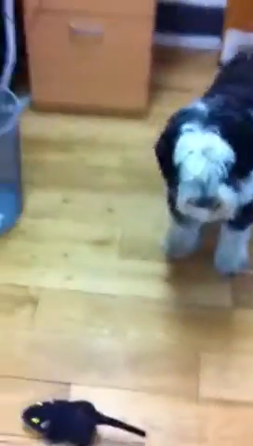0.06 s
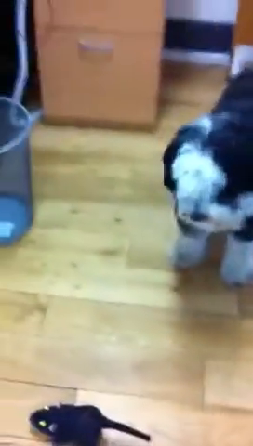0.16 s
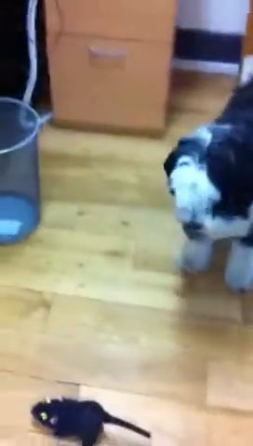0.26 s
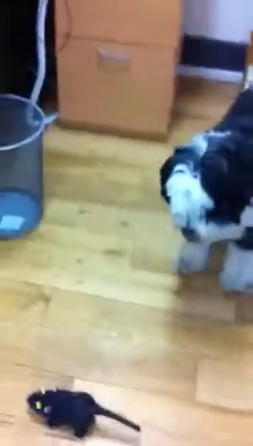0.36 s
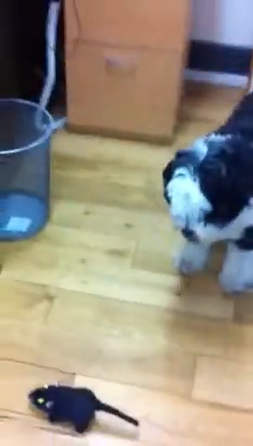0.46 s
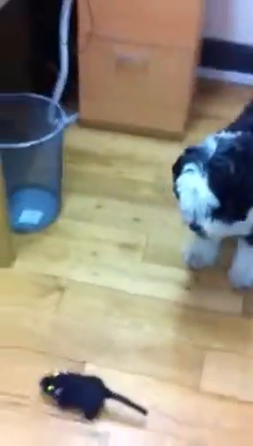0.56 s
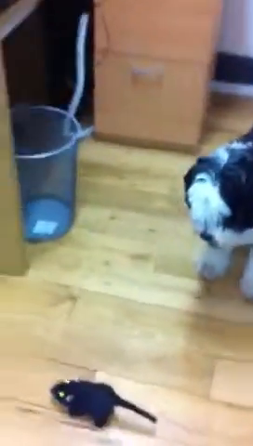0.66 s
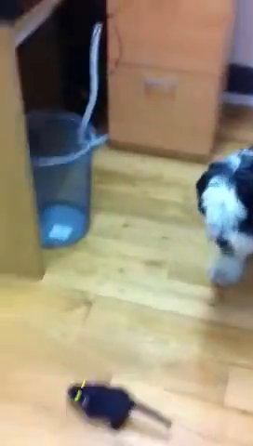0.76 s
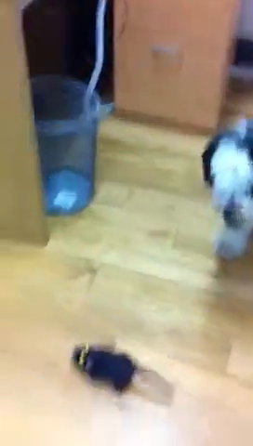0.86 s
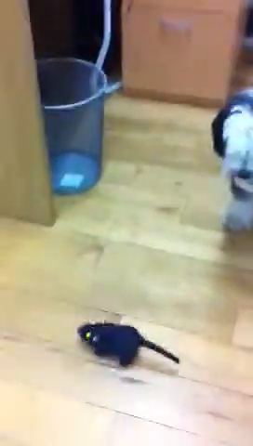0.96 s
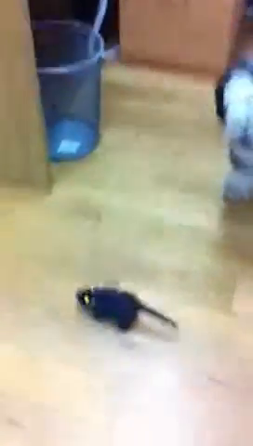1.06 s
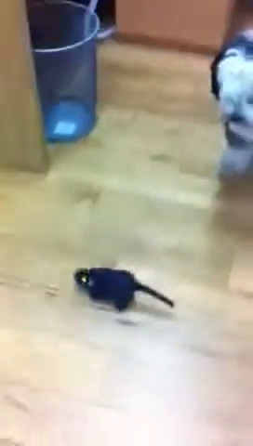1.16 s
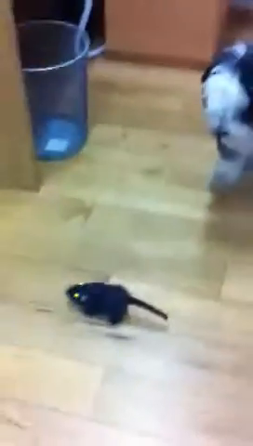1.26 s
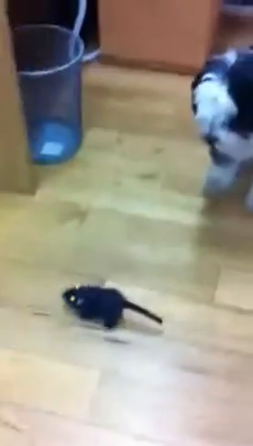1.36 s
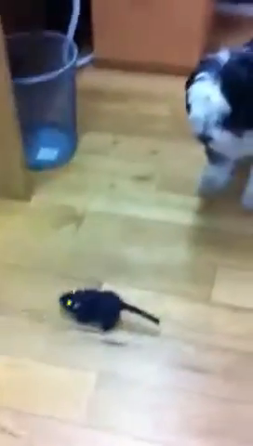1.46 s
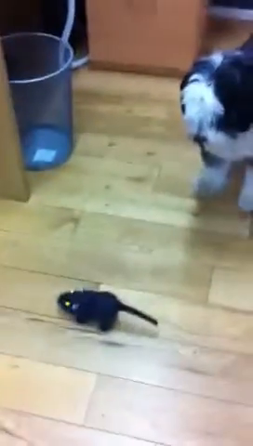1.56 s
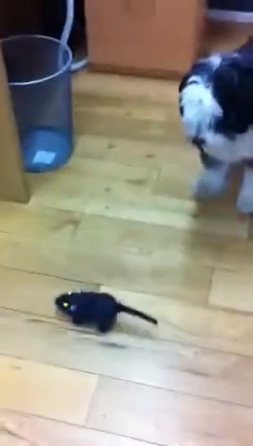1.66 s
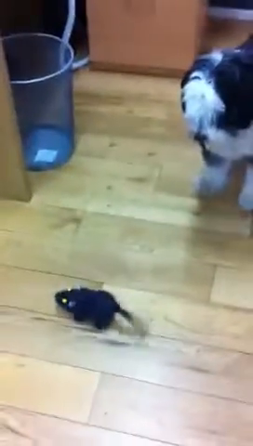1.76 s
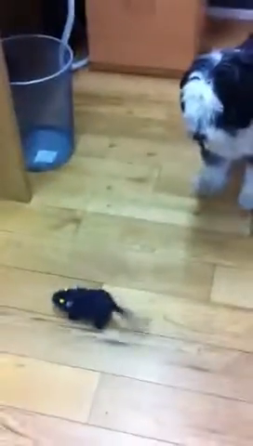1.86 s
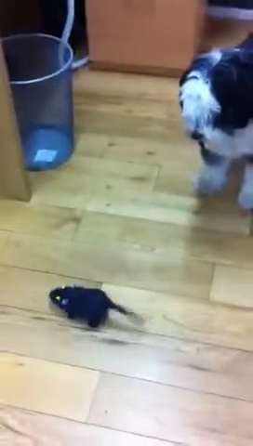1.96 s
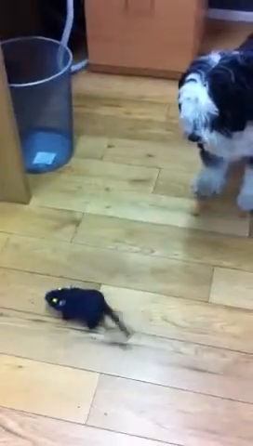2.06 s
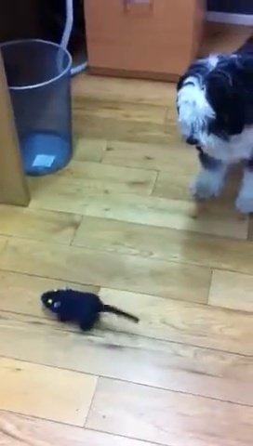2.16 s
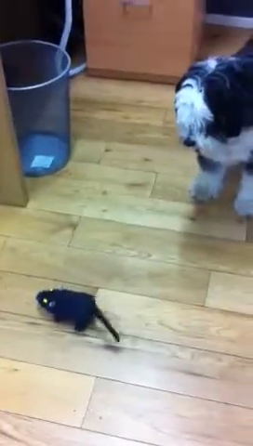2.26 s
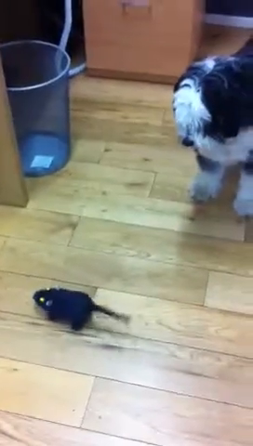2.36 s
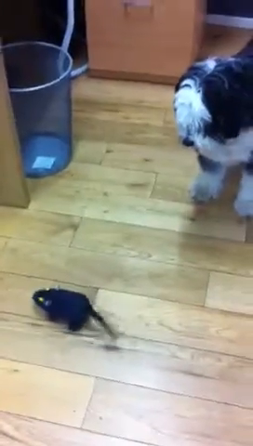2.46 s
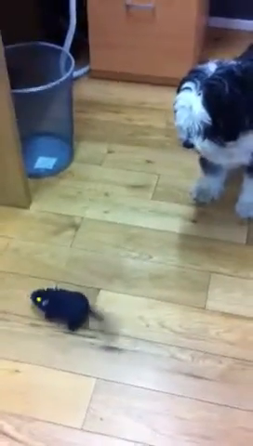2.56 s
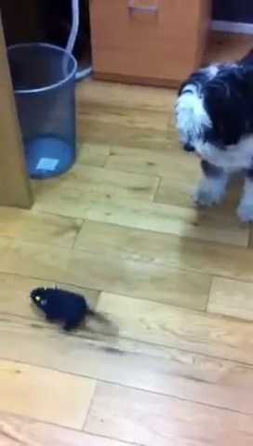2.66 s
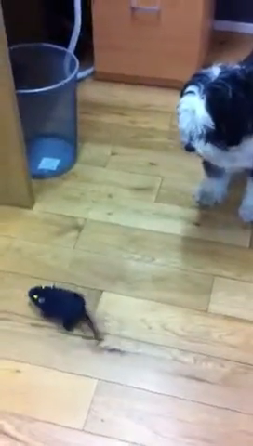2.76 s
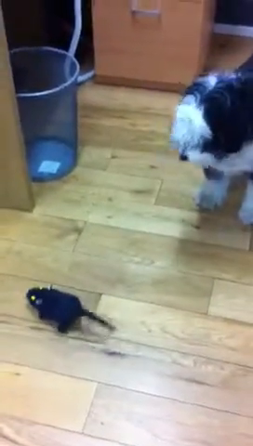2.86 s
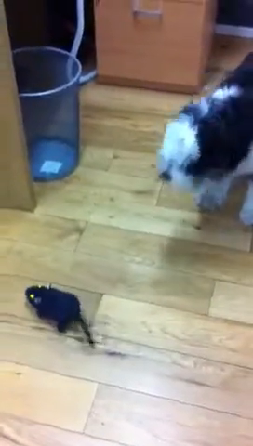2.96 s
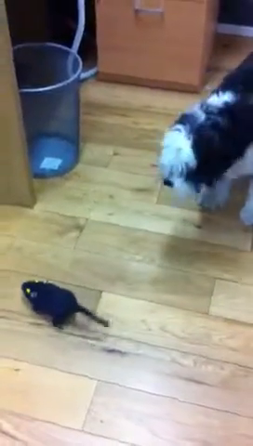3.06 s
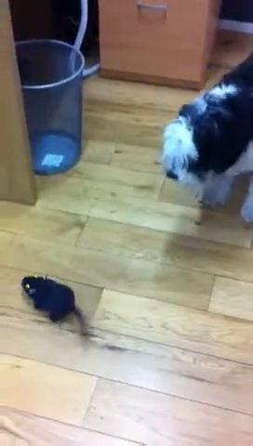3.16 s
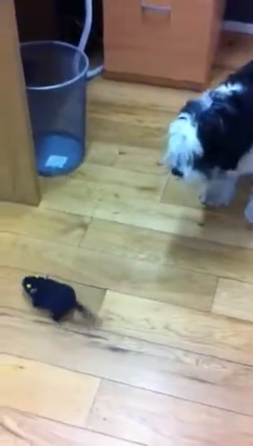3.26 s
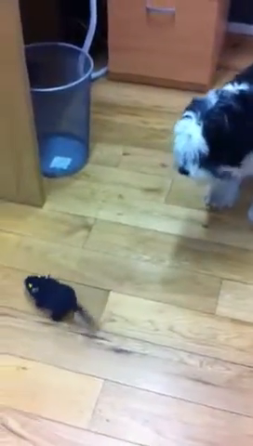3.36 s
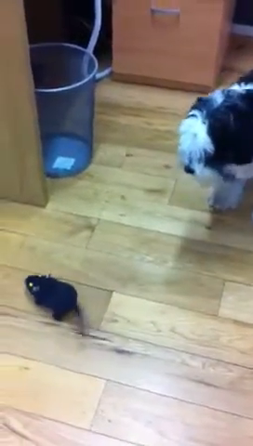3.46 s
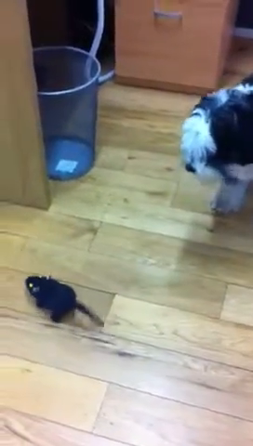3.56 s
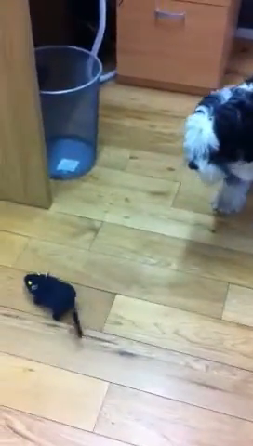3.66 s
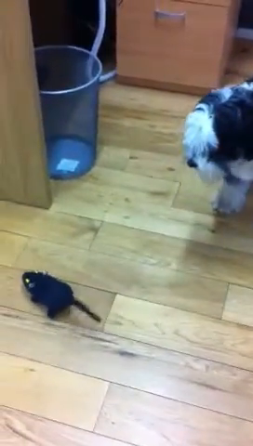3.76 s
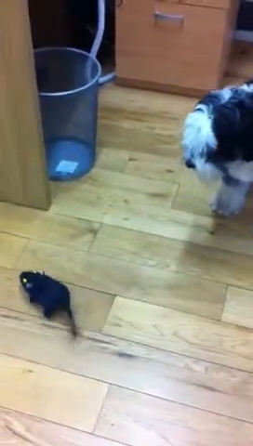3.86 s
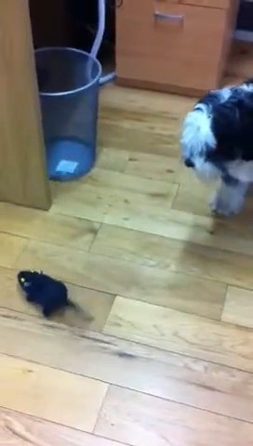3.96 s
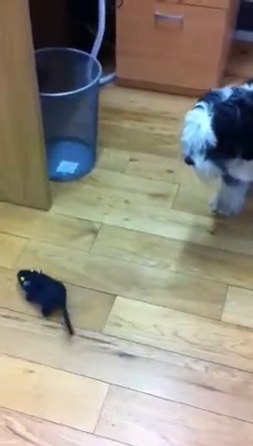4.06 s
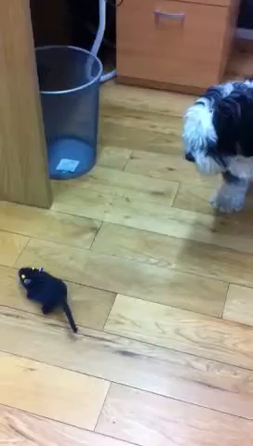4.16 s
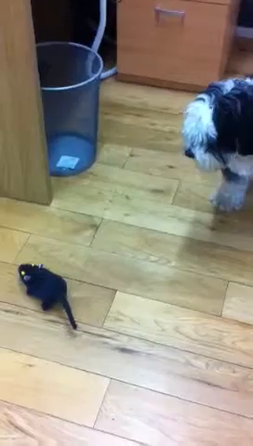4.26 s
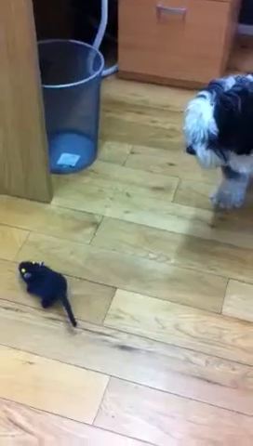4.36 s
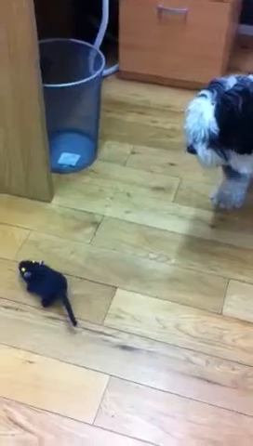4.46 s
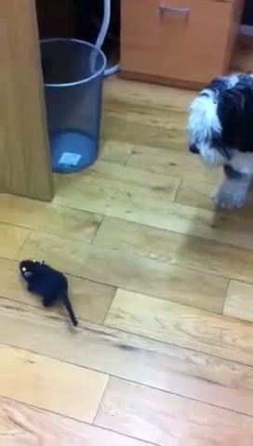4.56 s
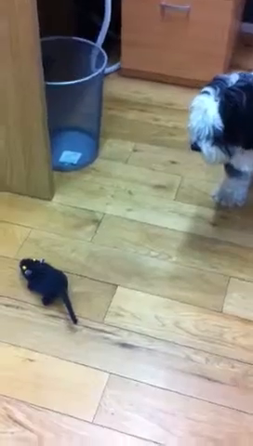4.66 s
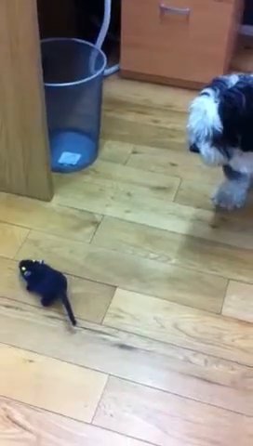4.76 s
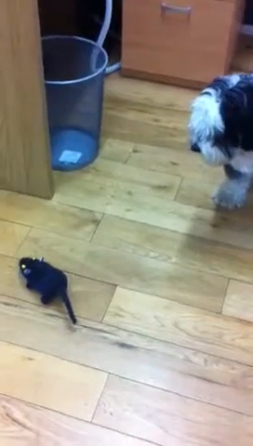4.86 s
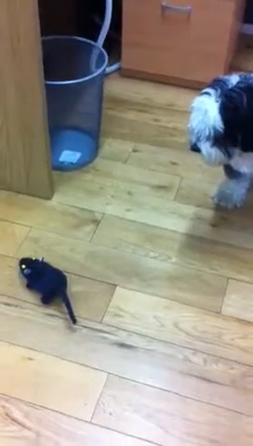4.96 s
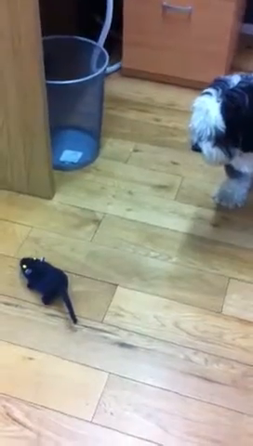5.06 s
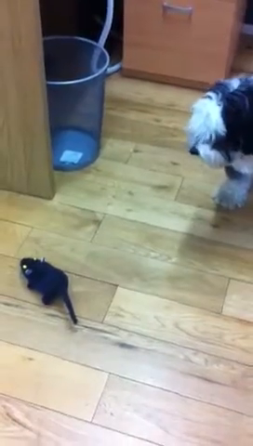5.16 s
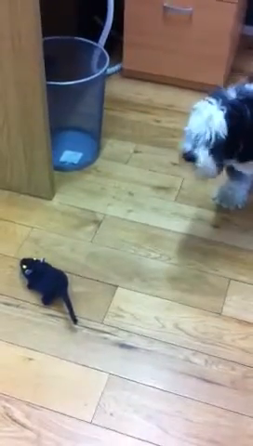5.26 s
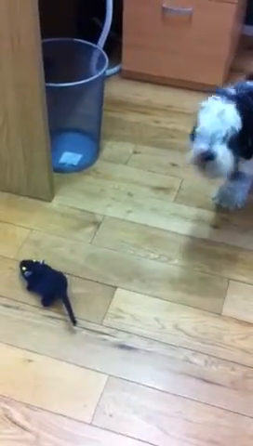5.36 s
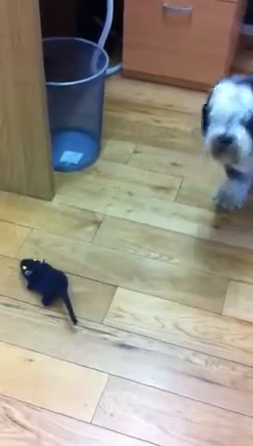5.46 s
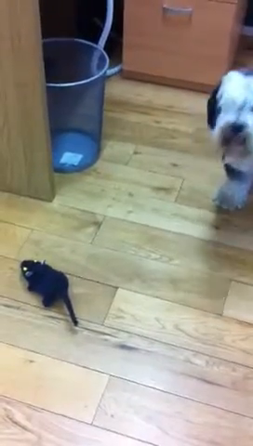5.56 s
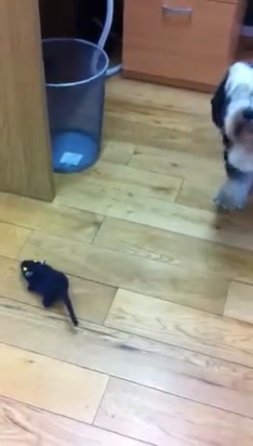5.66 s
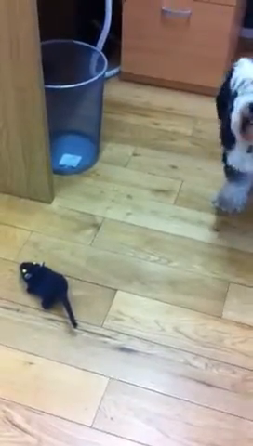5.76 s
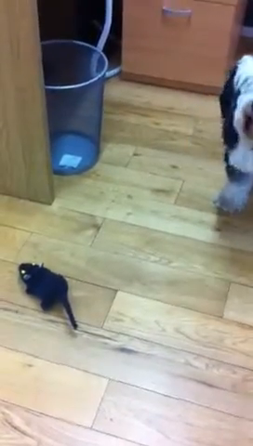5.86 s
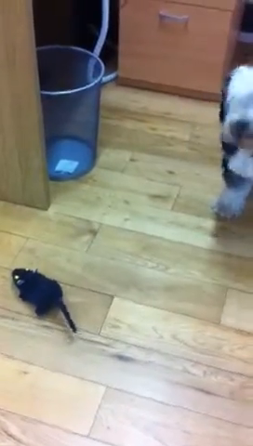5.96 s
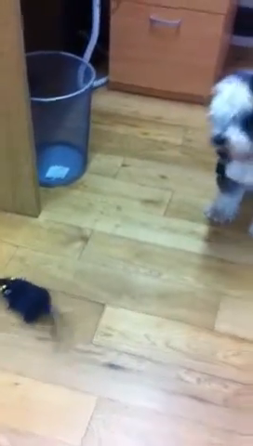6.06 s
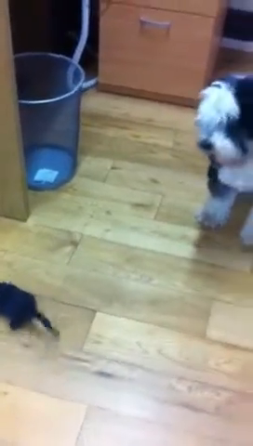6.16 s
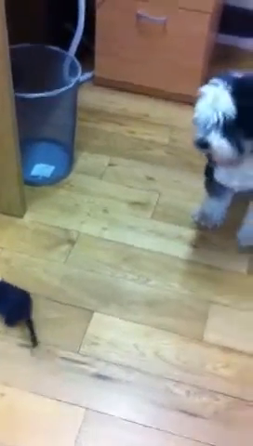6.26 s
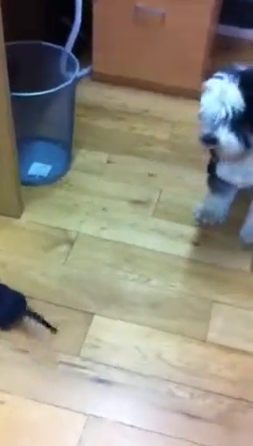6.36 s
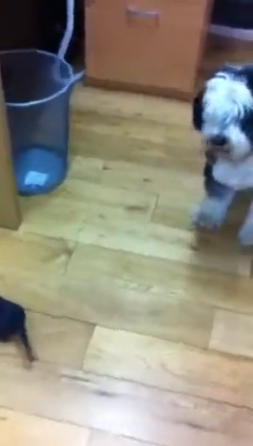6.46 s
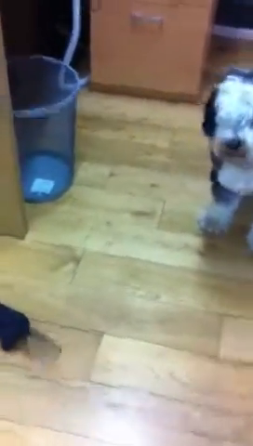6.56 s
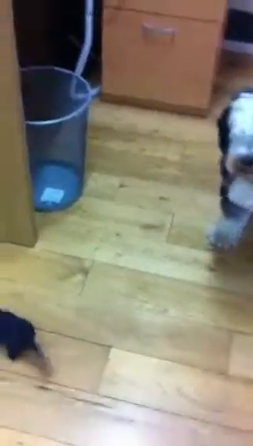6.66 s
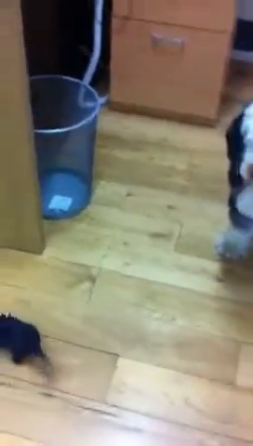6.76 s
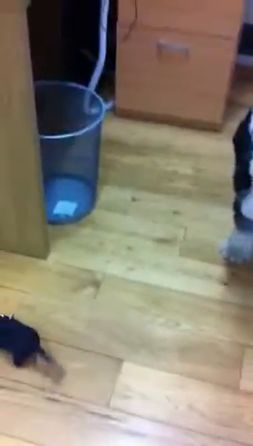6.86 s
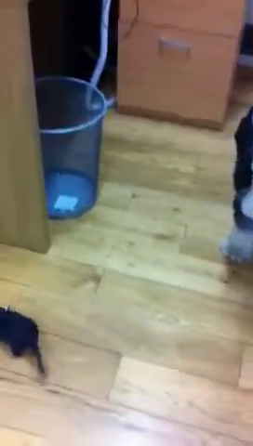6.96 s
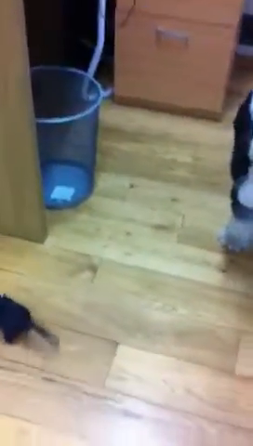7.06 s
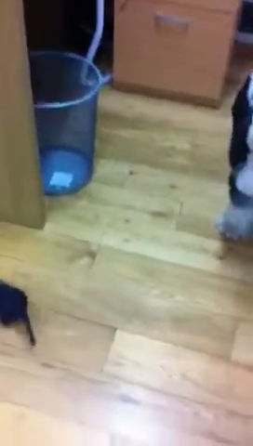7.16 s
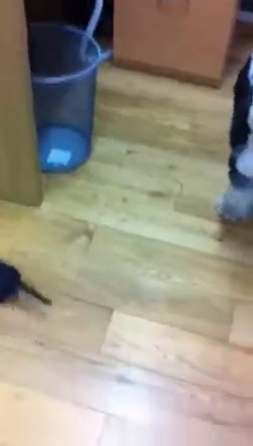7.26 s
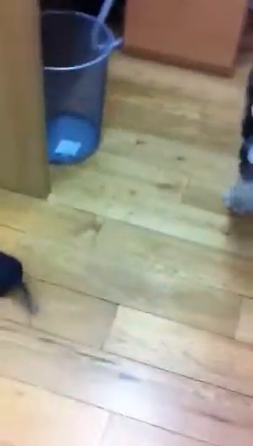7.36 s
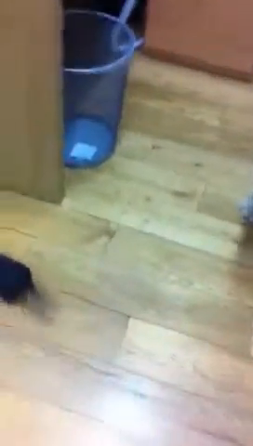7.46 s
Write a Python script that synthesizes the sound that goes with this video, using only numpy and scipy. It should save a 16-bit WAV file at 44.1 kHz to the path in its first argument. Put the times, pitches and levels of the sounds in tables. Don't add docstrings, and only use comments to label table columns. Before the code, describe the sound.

A battery toy whirs steadily on floorboards, chirping and clicking in two rapid, regular runs. Between them only the motor, tiny ticks, light paw steps and a faint sniff remain, broken by one abrupt dog bark. A second bark cuts into the later squeaks. After they stop, nails snap briefly on the boards. The room is small and reverberant, captured by a small recorder that ducks after loud sounds.

```python
import sys
import numpy as np
from scipy import signal
from scipy.io import wavfile
from scipy.ndimage import uniform_filter1d, minimum_filter1d

SR = 44100
rng = np.random.default_rng(int(sys.argv[2]) if len(sys.argv) > 2 else 0)


def amp(db):
    return 10 ** (np.asarray(db, float) / 20)


def write(x):
    x = np.atleast_2d(x).T
    wavfile.write(sys.argv[1], SR, np.round(np.clip(x, -1, 1) * 32767).astype(np.int16))


N = 330750
LEAD = 8820

# frequency in Hz, level in dB per Hz.
AIR_COLOUR = [(18, -60.5), (30, -10), (86, -26.5), (194, -7), (473, -14.5), (844, -14), (1960, -13),
              (2120, -0.5), (2540, -16.5), (10500, -15.5), (16000, -23.5)]
AIR_DB = -53.5
# frequency in Hz, time to fade by 60 dB in seconds.
ROOM_RING = [(150, 0.36), (500, 0.6), (1000, 0.55), (2000, 0.55), (4000, 0.7), (8000, 0.46), (14000, 0.38)]

# time in seconds, shaft turns per second in Hz.
MOTOR_SPEED = [(0, 224.6), (1.1, 230.7), (1.6, 224.3), (2.1, 213.6), (3.5, 211.7), (4.0, 213.3),
               (4.3, 224.6), (5.2, 227.2), (5.9, 224.6), (6.15, 216.5), (6.5, 213), (7.5, 212)]
IDLE_HZ, BUSY_HZ = 211, 227
# multiple of shaft speed, level idling in dB, level busy in dB.
MAIN_TONES = [(1, -75, -67), (4, -74.5, -63.5), (10, -60, -61.5)]
# multiple of shaft speed, level in dB against the tenth multiple.
SIDE_TONES = [(5, -14.5), (8, -7), (9, -6.5), (20, -17.5)]
# frequency in Hz, level in dB per Hz.
GEAR_COLOUR = [(240, -53), (400, -18), (537, -30.5), (781, -6.5), (845, -8.5), (1000, -14.5), (1910, -8),
               (2070, -12.5), (2510, -10.5), (6000, -23), (7800, -69), (13200, -120)]
GEAR_IDLE_DB, GEAR_BUSY_DB = -53, -49.5
THROB_HZ, THROB_DB, THROBS_PER_S = 157, -66.5, 11.3

# start in seconds, peak in dB, board pitch in Hz,
# slap of the skin in dB, shudder pitch of the floor in Hz.
PAW_THUDS = [
    (.259, -24.5, 365, -13, 376),
    (2.146, -34, 233, -23, 559),
    (2.79, -47.5, 300, -12.5, 402),
    (3.96, -45.5, 330, -1.5, 600),
    (4.099, -42, 190, -16.5, 400),
    (5.848, -41, 340, -3, 395.3),
    (6.462, -31.5, 202, -30.5, 267.6),
]
# start in seconds, peak in dB.
CLAW_SNAPS = [
    (6.183, -20),
    (6.191, -21),
    (6.211, -19.5),
    (6.219, -38),
]
# frequency in Hz, level in dB per Hz.
CLAW_COLOUR = [(240, -67), (400, -28), (873, -26), (957, -4), (2190, 5), (6890, -12.5), (9790, -14),
               (15500, -19.5)]
# start in seconds, length in seconds, level in dB.
SNIFFS = [
    (3.5, .17, -55.5),
    (3.9, .12, -62.5),
]
# start in seconds, peak in dB.
WHEEL_TICKS = [(2.2628, -43.5), (2.3506, -40.5), (2.5262, -42.5), (2.6998, -42), (2.8784, -42.5),
               (3.7678, -42)]

# squeak in seconds, pressure in dB, climb of the reed in seconds.
CAM_STROKES = [(-.06, -27.5, .013), (0.1063, -27, 0.015), (0.2717, -27.5, .013), (0.435, -28.5, 0.015),
               (0.595, -27.5, .013), (0.7623, -30, 0.011), (0.925, -29, 0.009), (1.09, -28.5, .013),
               (1.2564, -29.5, 0.016), (1.4207, -30, 0.014), (1.5856, -29.5, 0.0063), (1.7397, -30.5, .008),
               (1.9123, -28, .004), (4.0888, -28.5, .008), (4.265, -27.5, .009), (4.431, -27.5, .012),
               (4.5983, -28, .009), (4.7651, -28.5, .009), (4.9269, -28, .011), (5.089, -27, 0.014),
               (5.253, -27, 0.015), (5.4129, -33.5, 0.0097), (5.5792, -31.5, .012), (5.7431, -31.5, 0.01),
               (5.905, -30.5, .012), (6.0793, -31, .008)]
TURN_S, RELEASE_S = .163, .0695
CLICK_UNDER_DB, CLICK_SPREAD_DB = -3.5, 1.2
# factor on body pitch, level in dB, time to fade by 60 dB in seconds.
SHELL_MODES = [(1.0, -4, 0.044), (1.7, -9.5, 0.014), (2.7, -9.5, 0.021), (3.6, -15.5, 0.0066)]
BODY_HZ, BODY_SPREAD_HZ = 1247, 110
# multiple of pitch, level in dB, dB lost per 10% of pitch sag.
REED_TONES = [(1, -2.5, 2.5), (2, -2.5, 2.5), (3, -7.5, 0.5), (4, -8, 5), (5, -19.5, 12)]
REED_HZ, REED_SPREAD_HZ = 3037, 20
SAG, SAG_S, SAG_BEND, DB_PER_SAG = .2, .025, 1.7, 11.5
HOLD_S, SWELL_S = .006, .006
CLIMB_BEND, DB_PER_CLIMB = 1.6, 8

# time in seconds, pitch in Hz, effort in dB.
BARK_CURVES = [
    [(2.935, 200, -49), (2.975, 229.6, -47), (2.992, 293.6, -20.5), (2.999, 324.2, -8),
     (3.014, 442.4, -4.5), (3.04, 527.5, -10.5), (3.066, 495, -9), (3.1, 472.8, -10.5), (3.125, 440, -61)],
    [(5.262, 200, -54.5), (5.283, 233.4, -26.5), (5.298, 291.4, -11.5), (5.308, 415.3, -6.5),
     (5.32, 441.3, -8.5), (5.329, 525.8, -5.5), (5.35, 527.7, -15.5), (5.385, 520, -6), (5.42, 467, -56)],
]
# roughness when tense from 0 to 1, widest mouth as a factor on the throat,
# brightness in dB.
BARK_MANNER = [
    (.2, 1.008, 0),
    (.17, 0.967, 1),
]
# resonance in Hz, width in Hz, level in dB.
CHEST = [(248.5, 98, -14.5), (520, 140, -15)]
CHEST_SLACK_DB = 11
# resonance in Hz, width in Hz, level in dB.
MOUTH = [(1605, 345, -1), (2120, 690, -5.5), (3246, 825, -19.5)]
JAW_HZ, JAW_WIDTH_HZ = 885, 300
# resonance in Hz, width in Hz, level in dB.
TEETH_RASP = [(3700, 700, -31.5), (5830, 2800, -32), (8470, 3200, -37), (10700, 3100, -48)]
SLACK_HZ, TENSING_HZ = 200, 95
ROUGH_SLACK, MOUTH_SLACK = 1, 0.79
JITTER, WOBBLE = 0.007, .015
TOP_HZ = 520
BRIGHT_DB_PER_OCTAVE, BRIGHT_PER_EFFORT, RASP_DB_PER_OCTAVE = 12, 0.33, 6

# frequency in Hz, level in dB per Hz.
RECORDER_RUMBLE = [(20, -1.5), (45, 1.5), (120, -5), (200, -42), (400, -90)]
EDGE_HZ = 15800
# frequency in Hz, dB under that neighbour.
NEAR_MASK = [(3500, 16.5), (4500, 41), (7000, 22.5), (10000, 24), (13500, 20), (16000, 6)]
# frequency in Hz, dB under that band.
FAR_MASK = [(4000, 62), (10000, 54), (13000, 51), (16000, 40.5)]


def evened(x):
    return x / np.sqrt(np.mean(x ** 2) + 1e-20)


def read(points, hz):
    f, value = np.transpose(points)
    return np.interp(np.log(hz + 1), np.log(f + 1), value)


def add(mix, s, sound):
    part = mix[round(s * SR) + LEAD:][:len(sound)]
    part += sound[:len(part)]


def resonate(x, hz, width):
    turn = np.exp(2j * np.pi * np.cumsum(hz * np.ones(len(x))) / SR)
    r = np.exp(-np.pi * width / SR)
    smooth = signal.lfilter([1 - r], [1, -r], x / turn + 1e-18)
    return 2 * (turn * smooth).real


def steep(x, hz, width):
    return resonate(resonate(x, hz, width), hz, width)


def wander(count, span):
    once = uniform_filter1d(rng.standard_normal(count), span)
    return evened(uniform_filter1d(once, span))


def noise(colour, patchy_db, count=N + LEAD):
    hz = np.fft.rfftfreq(1024, 1 / SR)
    a, b, patches = rng.standard_normal((count // 256 + 5, 513, 3)).T
    patches = evened(uniform_filter1d(uniform_filter1d(patches, 10, 0), 12, 1))
    z = (a + 1j * b) * amp(read(colour, hz)[:, None] + patchy_db * patches)
    return evened(signal.istft(z, nperseg=1024, noverlap=768)[1][:count])


def room(x, first_s):
    taps = np.zeros(SR)
    at = np.arange(round(first_s * SR), SR - 20, 20)
    taps[at + rng.integers(0, 20, len(at))] = rng.choice([-1., 1.], len(at))
    hz, t, z = signal.stft(taps, SR, nperseg=256)
    fade = amp(-60 * t / read(ROOM_RING, hz)[:, None])
    tail = signal.istft(z * fade, SR, nperseg=256)[1]
    return signal.fftconvolve(x, tail / np.linalg.norm(tail))[:len(x)]


def air():
    return amp(AIR_DB) * noise(AIR_COLOUR, 1.6)


def motor():
    t = (np.arange(N + LEAD) - LEAD) / SR
    hz = np.interp(t, *np.transpose(MOTOR_SPEED))
    busy = (hz - IDLE_HZ) / (BUSY_HZ - IDLE_HZ)
    gear_db = GEAR_IDLE_DB + (GEAR_BUSY_DB - GEAR_IDLE_DB) * np.clip(2.8 * busy, 0, 1)
    turns = np.cumsum(hz * (1 + 0.00795 * wander(len(t), span=900))) / SR
    tones = [(k, idle_db + (busy_db - idle_db) * busy) for k, idle_db, busy_db in MAIN_TONES]
    tenth_db = tones[-1][1]
    tones += [(k, tenth_db + db) for k, db in SIDE_TONES]
    whine = sum(amp(db + 4.6 * wander(len(t), span=700)) * np.sin(2 * np.pi * k * turns) for k, db in tones)
    wobble = np.cumsum(THROBS_PER_S * (1 + 0.039 * wander(len(t), span=6000))) / SR
    throb = resonate(rng.standard_normal(len(t)), THROB_HZ, 36) * np.sin(np.pi * wobble) ** 2
    rattle = amp(gear_db - 2.0) * noise(GEAR_COLOUR, 2.2)
    return np.sqrt(2) * whine + rattle + amp(THROB_DB) * evened(throb)


def tick(s, db):
    t = np.arange(900) / SR
    burst = amp(-60 * t / .02) * rng.standard_normal(len(t))
    return s, amp(db - 6) * steep(burst, 11500, 9000)


def sniff(s, length, db):
    hiss = steep(rng.standard_normal(round(length * SR)), 10500, 9000)
    return s, amp(db) * evened(hiss) * np.hanning(len(hiss))


def claw(s, db):
    t = np.arange(4000) / SR
    snap, scrape = amp(-2.5 - 60 * t / 0.0038), amp(-12 - 60 * t / 0.14)
    skid = noise(CLAW_COLOUR, 0, count=4000) * (snap + scrape)
    return s, amp(db) * signal.sosfilt(signal.butter(3, 800, "high", fs=SR, output="sos"), skid)


def thud(s, db, board_hz, slap_db, shudder_hz):
    t = np.arange(4000) / SR
    modes = [(.8, 0.5, 0.022), (1.0, 6, 0.024), (1.35, -3.5, 0.033), (2.1, -20.5, 0.024)]
    board = sum(amp(g - 60 * t / t60) * np.sin(2 * np.pi * k * board_hz * t) for k, g, t60 in modes)
    shudder = steep(rng.standard_normal(len(t)), shudder_hz, 1.05 * shudder_hz) * amp(8.0 - 60 * t / 0.13)
    slap = resonate(rng.standard_normal(len(t)), 1700, 1482) * amp(slap_db + 11.5 - 60 * t / 0.099)
    soft_start = 1 - np.exp(-t / 0.0016)
    return s, amp(db) * ((board + shudder) * soft_start + slap)


def click(s, db, body_hz):
    t = np.arange(1500) / SR
    shell = sum(amp(g - 60 * t / t60) * np.sin(2 * np.pi * k * body_hz * t) for k, g, t60 in SHELL_MODES)
    dull = resonate(amp(8.5 - 60 * t / 0.0081) * rng.standard_normal(len(t)), 1950, 1800)
    return s, amp(db - 4.5) * (0.77 * shell + dull)


def squeak(s, db, top_hz, climb_s):
    climb_s = max(climb_s, .003)
    t = np.arange(-climb_s, HOLD_S + SAG_S, 1 / SR)
    climbing = t < 0
    way = np.where(climbing, -t / max(climb_s, .008), np.maximum(t - HOLD_S, 0) / SAG_S)
    sag = np.sin(np.pi / 2 * way) ** np.where(climbing, CLIMB_BEND, SAG_BEND)
    factor = 1 - SAG * sag
    swell = 1 - np.exp(-(t + climb_s) / (SWELL_S * (climb_s / 0.015) ** 2))
    edges = swell * np.minimum((t[-1] - t) / .004, 1)
    turns = np.cumsum(top_hz * factor * (1 + 0.0095 * wander(len(t), span=40))) / SR
    reed = sum(amp(g - 10 * lost_db * (1 - factor)) * np.sin(2 * np.pi * k * turns + k)
               for k, g, lost_db in REED_TONES)
    pressure_db = db - 5 - np.where(climbing, DB_PER_CLIMB, DB_PER_SAG) * sag ** 0.91
    return s + .003 - climb_s, amp(pressure_db) * edges * reed


def cam():
    s, db, climb_s = np.transpose(CAM_STROKES)
    a, b, c = rng.standard_normal((len(s), 3)).T
    squeaks = list(zip(s, db, REED_HZ + REED_SPREAD_HZ * a, climb_s))
    turn_s = np.maximum(s, np.append(s[0], s[:-1] + TURN_S))
    click_db = db + CLICK_UNDER_DB + CLICK_SPREAD_DB * b
    clicks = np.transpose([turn_s + RELEASE_S, click_db, BODY_HZ + BODY_SPREAD_HZ * c])
    keeps_turning = np.append(np.diff(s) < 1, True)
    creak = (2.637, -38, 970)
    return squeaks, list(clicks[keeps_turning]) + [creak]


def bark(rows, hoarse, widest, manner_db):
    s, *columns = np.transpose(rows)
    t = np.arange(s[0], s[-1], 1 / SR)
    hz, effort_db = (np.interp(t, s, c) for c in columns)
    slack = np.exp(-(hz - SLACK_HZ) / TENSING_HZ)
    octaves = np.log2(hz / TOP_HZ)
    rough = np.clip(hoarse + (ROUGH_SLACK - hoarse) * slack, 0, 1)
    mouth = widest + (MOUTH_SLACK - widest) * slack
    bright_db = manner_db + BRIGHT_DB_PER_OCTAVE * octaves + BRIGHT_PER_EFFORT * np.maximum(effort_db, -25)
    shake = (JITTER + 0.1 * rough) * wander(len(t), span=60) + WOBBLE * wander(len(t), span=500)
    turns = np.cumsum(hz * (1 + shake)) / SR
    folds = sum(np.cos(2 * np.pi * k * turns) for k in range(1, 14))
    puffs = (0.26 + np.exp(-(turns % 1) / 0.34)) * rng.standard_normal(len(t))
    drive = (1 - rough) * evened(folds) + rough * evened(puffs)
    chest = sum(amp(db + CHEST_SLACK_DB * slack) * steep(drive, f, w) for f, w, db in CHEST)
    jaw = steep(drive, JAW_HZ * mouth, JAW_WIDTH_HZ)
    lips = sum((-1) ** k * amp(db) * steep(drive, f * mouth, w) for k, (f, w, db) in enumerate(MOUTH))
    rasp = sum(amp(db + RASP_DB_PER_OCTAVE * octaves + 2.3 * wander(len(t), span=350))
               * steep(evened(puffs), f, w) for f, w, db in TEETH_RASP)
    throat = chest - jaw + amp(bright_db) * lips + rasp
    level = np.sqrt(uniform_filter1d(throat ** 2, 400) + 1e-12)
    return s[0], amp(effort_db) * throat / level * signal.windows.tukey(len(t), .08)


def scene():
    dog, feet, *toy = np.zeros((5, N + LEAD))
    for source, table in [(thud, PAW_THUDS), (claw, CLAW_SNAPS), (sniff, SNIFFS), (tick, WHEEL_TICKS)]:
        for row in table:
            add(feet, *source(*row))
    for source, table in zip([squeak, click], cam()):
        for k, row in enumerate(table):
            add(toy[k % len(toy)], *source(*row))
    for rows, manner in zip(BARK_CURVES, BARK_MANNER):
        add(dog, *bark(rows, *manner))
    wet = amp(-3.5) * room(dog, .009) + amp(-3.5) * room(feet, 0.0041)
    wet = wet + amp(3.0) * sum(room(x, .004) for x in toy)
    return (dog + feet + sum(toy) + wet + motor() + air())[None, LEAD:]


def masked(x):
    hz, t, z = signal.stft(x, SR, nperseg=2048, noverlap=1024)
    band_db = 10 * np.log10(uniform_filter1d(abs(z) ** 2, size=13, axis=1) + 1e-20)
    loudest_near_db = -minimum_filter1d(-band_db, size=141, axis=1)
    near_db = loudest_near_db - read(NEAR_MASK, hz)[:, None]
    far_db = band_db.max(axis=1, keepdims=True) - read(FAR_MASK, hz)[:, None]
    quiet = (band_db < np.maximum(near_db, far_db)) & (hz > 3900)[:, None]
    return signal.istft(z * ~quiet, SR, nperseg=2048, noverlap=1024)[1][:, :N]


def roll_off(x):
    return signal.sosfilt(signal.butter(12, 16710, fs=SR, output="sos"), x)


def record(dry):
    power_db = 10 * np.log10(abs(uniform_filter1d(dry[0] ** 2, 600)) + 1e-12)
    fall = np.arange(N) * 4.14 / SR
    held_db = np.maximum.accumulate(power_db + fall) - fall
    over_db = np.maximum(held_db + 20.0, 0)
    ducked = dry / amp(0.34 * uniform_filter1d(over_db, 300))
    rounded = 0.97 * np.tanh(ducked / 1.027)
    cut = signal.sosfilt(signal.butter(3, 135, "high", fs=SR, output="sos"), rounded)
    cut = cut + amp(-90) * noise(RECORDER_RUMBLE, 4, count=N)
    edge = signal.firwin(511, EDGE_HZ, window=("kaiser", 9), fs=SR)
    edged = signal.oaconvolve(cut, edge[None], "same")
    return roll_off(masked(edged))


dry = scene()
out = record(dry)
write(out)
```